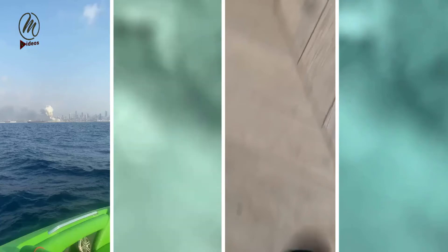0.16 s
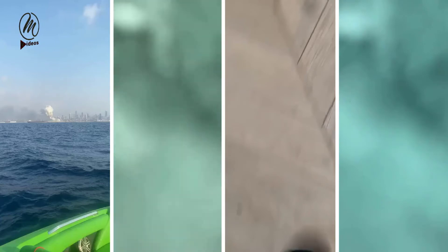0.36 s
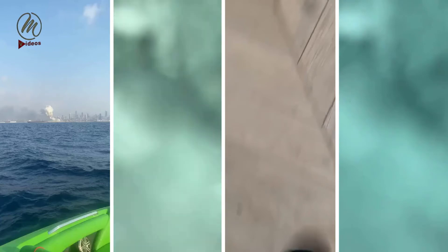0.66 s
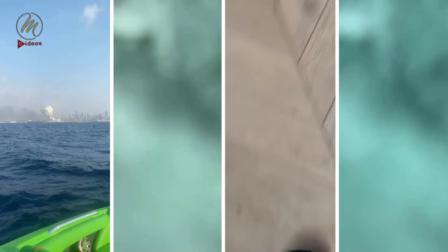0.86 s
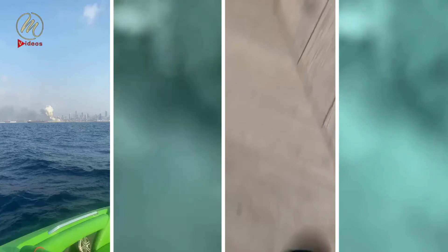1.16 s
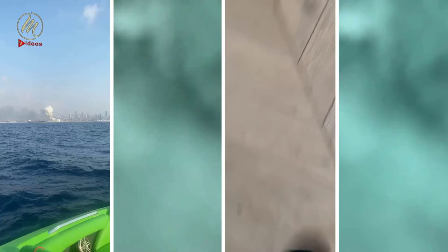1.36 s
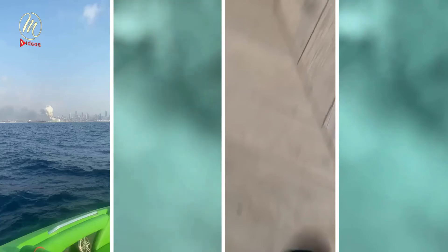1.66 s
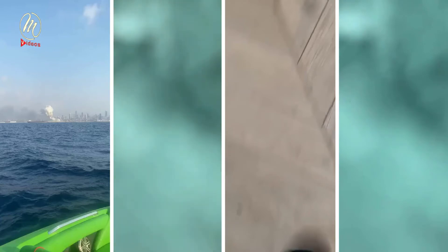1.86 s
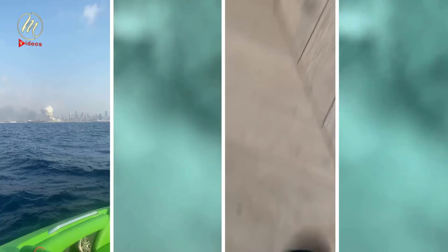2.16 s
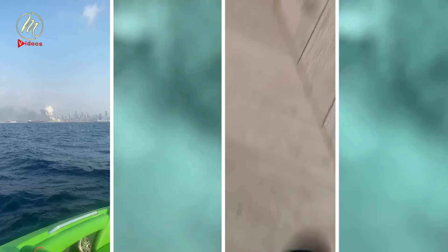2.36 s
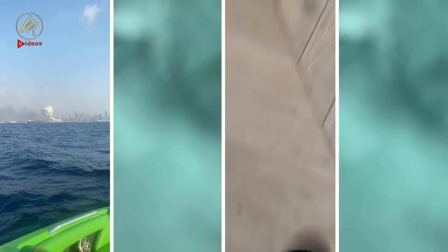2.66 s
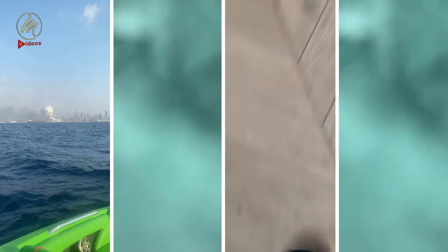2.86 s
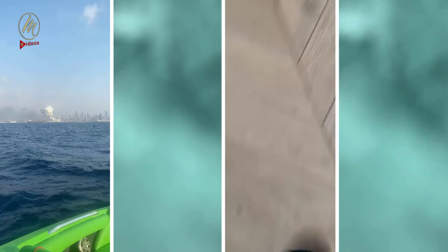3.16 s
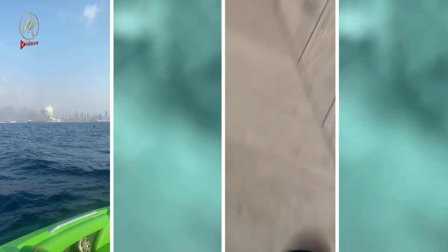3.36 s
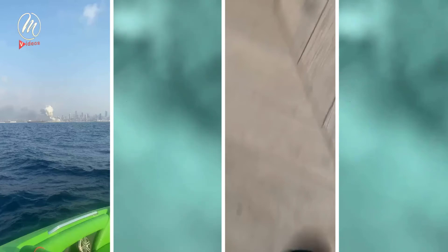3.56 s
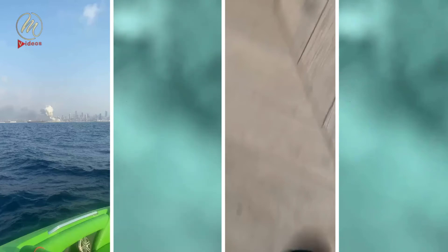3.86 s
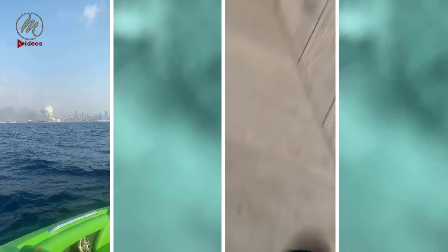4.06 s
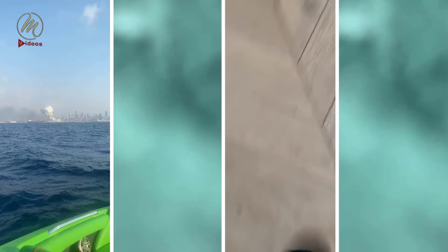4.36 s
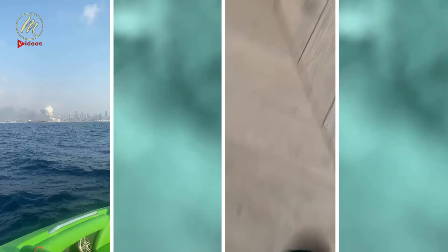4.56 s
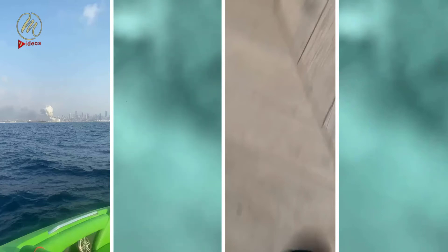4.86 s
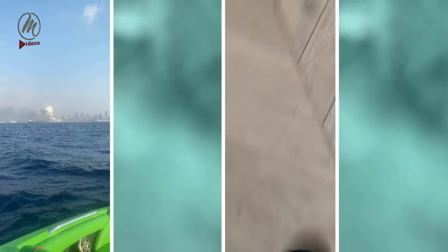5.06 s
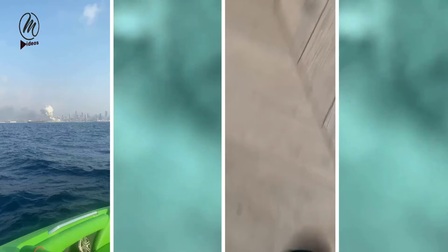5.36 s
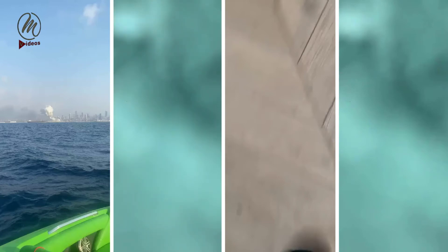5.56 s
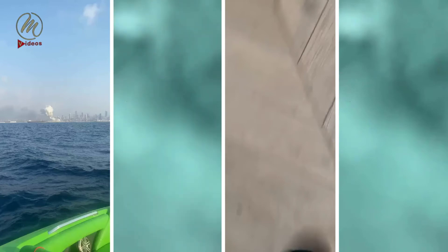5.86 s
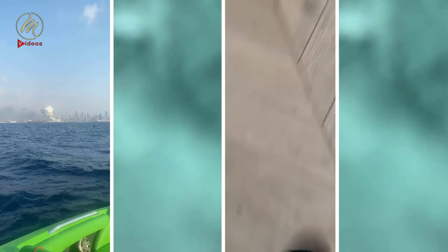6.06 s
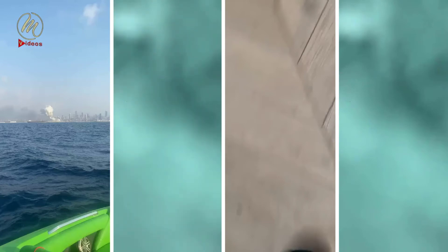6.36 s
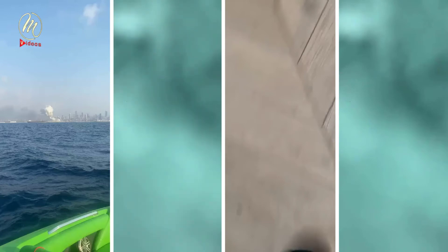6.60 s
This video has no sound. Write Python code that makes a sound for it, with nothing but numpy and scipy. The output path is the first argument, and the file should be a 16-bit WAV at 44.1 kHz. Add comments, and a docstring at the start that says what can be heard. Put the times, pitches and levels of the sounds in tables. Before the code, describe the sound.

From a small boat on open sea, a massive far explosion arrives already loud: ragged gruff reports, sharp snaps and dry ticks over a deep boom. After about a second the crackle smooths into a rolling roar that surges and slowly dies, with soft pressure thuds. Wavelets hiss and slap close by. A phone microphone outdoors, bass-heavy with slightly hollow stereo treble.

```python
"""A huge far explosion over open water opens with ragged reports, snaps and ticks: gated and sparse noise.
Under them a boom, a roll and a roar of filtered noise surge and die away, and pressure waves thud to 4.5 s.
The level dips briefly at 0.8 s, and after about a second the crackle of the roar blurs into smooth noise.
A hiss of wavelets runs throughout, with slaps and ringing bubbles from 1.1 s, a hollow rush near 3 s and
a faint ring of narrow noise bands at 5.5 s. Two microphone ports give the treble a hollow width."""
import sys
import numpy as np
from scipy import signal
from scipy.fft import rfft, irfft, next_fast_len
from scipy.io import wavfile
from scipy.ndimage import uniform_filter1d

SR = 44100
rng = np.random.default_rng(int(sys.argv[2]) if len(sys.argv) > 2 else 0)


def transcribe(signal):
    """Save signal, clipped to [-1, 1], as a 16-bit WAV file at the path in sys.argv[1]."""
    frames = np.atleast_2d(signal).T
    limited = np.clip(frames, -1, 1)
    pcm = np.round(limited * 32767).astype(np.int16)
    wavfile.write(sys.argv[1], SR, pcm)


N = 296855
TIME = np.arange(N) / SR
SIZE = next_fast_len(N + SR // 10, real=True)  # samples in each padded transform
HZ = np.fft.rfftfreq(SIZE, 1 / SR)
EDGE_HZ = 11250  # upper limit of the sound

# how alike the two ports hear: frequency_hz, likeness (held within 0 to 0.999)
PORT_LIKENESS = [(50, 1), (130, 1.06), (330, 0.8), (550, 0.58), (800, -0.37), (1050, -0.05), (1450, 0.7),
                 (2100, 0.42), (2800, 0.7), (4000, 0.1), (4900, 1.04), (5400, 1.04), (6500, 0.1),
                 (7500, .98), (9400, 2), (10400, -0.2), (11200, 1.8)]
# phase between the ports: frequency_hz, left_lead_rad
PORT_LEAD = [(30, -.03), (130, -.1), (500, -.25), (700, -.45), (1100, .2), (1650, .1), (2300, 2.6),
             (3100, 2.9), (4100, 2), (4900, 3), (5500, 3.25), (6000, 3.8), (7200, 6.2), (10000, 6.4),
             (11000, 9.2)]
# loudness between the ports: frequency_hz, left_minus_right_db
PORT_BALANCE = [(55, 0.5), (120, -1.4), (200, -2.5), (340, -4.5), (600, -1), (1100, -2.5), (1950, -3),
                (3500, 0), (6200, 0), (11000, 0)]
# the instant when the level dips: start_s, end_s
DROPOUT = (.803, .8128)
DROPOUT_DB = -36

# partials of the faint thin ring: pitch_hz, relative_level_db
RING_PARTIALS = [(3688, -80), (4705, -89), (5609, -75), (6998, -86), (7725, -81), (8306, -87), (8603, -86),
                 (8942, -88), (9114, -87), (9335, -87), (9808, -88), (10691, -84)]
# loudness of the ring: time_s, level_db
RING_LEVEL = [(5.50, -110), (5.53, -69), (5.76, -69), (5.9, -81), (6.05, -120)]
# resonances of the hollow rush: pitch_hz, width_hz, relative_level_db
RUSH_RESONANCES = [(1150, 1000, -1.5), (2260, 300, -1), (3700, 550, -12), (4400, 140, -1.5)]
# loudness of the rush: time_s, level_db
RUSH_LEVEL = [(2.74, -84), (2.86, -49), (2.95, -44), (3.1, -47), (3.28, -50), (3.4, -56), (3.6, -56),
              (3.9, -54), (4.4, -79.5)]
# spectrum of the hiss: frequency_hz, relative_level_db (per Hz)
WASH_SPECTRUM = [(700, -36), (1500, -1.5), (2300, 6), (3000, 2), (4150, -2), (4450, 4), (4750, -3.5),
                 (5300, -2), (6300, -3.5), (7200, -5), (9000, -7.5), (10500, -11.5), (11800, -3.5)]
# dying away of the hiss: start_level_db, settled_level_db, time_constant_s
WASH_FADE = (-38.5, -78.5, 3.58)
# wavelets that break and lift the hiss: crest_s, length_s, lift_db, extra_treble_lift_db
WAVELETS = [(0.03, 0.23, 1, 15.5), (0.27, 0.096, 5, -3), (0.47, 0.23, 0.5, 4), (0.767, 0.036, 1, 2),
            (1.032, 0.19, 8, 3), (1.145, 0.038, 3, 4), (0.923, 0.032, 3.5, 6), (1.335, 0.25, 4, 0),
            (1.637, 0.2, 2.5, 2.5), (2, 0.22, 9, -1), (2.33, 0.2, 2.5, 2), (2.64, 0.1, 8, 5),
            (2.89, 0.25, 5, 6), (3.13, 0.22, 4.5, 3), (3.316, 0.22, 11.5, -1), (3.808, 0.63, 8, -0.5),
            (4.102, 0.089, 6.5, 2), (4.33, 0.22, 1.5, -1), (4.623, 0.058, 13.5, 0), (5.25, 0.29, 5.5, 3.5),
            (5.588, 0.37, 2, 1.5), (6.11, 0.077, 1, 7.5), (6.34, 0.081, 6.5, 5)]
WAVELET_RISE = 0.26  # share of a wavelet's length that comes before its crest
SPRAY_DB = -7  # gain of the treble of the hiss between wavelets
# ringing bubbles: start_s, level_db (before the envelope), start_pitch_hz, glide_hz_per_s, t60_s
BUBBLES = [(1.987, -23.5, 1500, 0, 0.052), (3.979, -50.5, 9500, 1000, .08), (4.109, -32, 2070, 500, .08),
           (4.121, -37, 1300, 16000, .07)]
# slaps of water: start_s, peak_db (before panning), pitch_hz, width_hz, t60_s, left_minus_right_db
SPLASHES = [(1.138, -9.5, 2020, 2210, 0.1, 2), (1.141, -31, 3760, 1100, 0.25, -3),
            (1.27, -32, 3600, 2400, .25, 1), (1.616, -29, 2470, 1600, 0.16, 0),
            (2.611, -40, 7650, 3000, 0.091, 1), (2.912, -34.5, 3400, 2420, 0.34, -2),
            (3.25, -33, 2760, 2400, 0.19, -2), (4.620, -40, 2200, 1800, 0.097, 2),
            (4.620, -45, 6300, 3400, 0.14, 7), (5.202, -36, 4300, 1800, 0.017, 1),
            (5.204, -28, 930, 303, 0.076, -0.5), (5.207, -39, 2800, 1800, .07, 2),
            (5.217, -44, 4900, 900, .016, 5), (5.255, -51, 7960, 2400, .16, 1),
            (5.525, -53, 3620, 500, .1, -2), (6.61, -55, 6200, 3600, 0.16, 6)]

# pressure waves: middle_s, peak_db, push_to_suck_s (before the microphone thins it)
THUDS = [(0.134, -12, 0.0066), (0.32, -6, 0.0044), (0.352, -4, 0.0039), (0.686, -6.5, 0.004),
         (0.729, -6, 0.0032), (0.79, -4, 0.0055), (0.817, -6.5, 0.0054), (0.855, -12, 0.0039),
         (1.095, -8.5, 0.0033), (1.133, -11.5, .009), (1.605, -8, 0.0042), (1.697, -18, 0.0032),
         (2.310, -7, 0.0039), (2.329, -4.5, 0.004), (2.379, -8, 0.0051), (2.403, -9, 0.0038),
         (3.592, -8, 0.0042), (3.787, -8.5, 0.0048), (4.103, -12, 0.0037), (4.272, -10, 0.0022),
         (4.395, -12, 0.0044), (4.479, -9, 0.0026)]
# spectrum of the dry ticking: frequency_hz, relative_level_db (per Hz)
TICK_SPECTRUM = [(300, -12), (800, 5), (1500, 3), (2500, 1.5), (4500, -9), (7000, -14.5), (11000, -18.5)]
# loudness of the ticking: time_s, level_db
TICK_LEVEL = [(0, -32), (.35, -37.5), (.8, -43.5), (1.1, -37), (1.5, -61), (2.2, -77)]
# spectrum of a snap: frequency_hz, relative_level_db (per Hz)
SNAP_SPECTRUM = [(600, -18), (1500, 6), (2500, 3), (4300, 9), (6500, 2), (9000, -2), (11500, -17)]
# sharp snaps in the crackle: start_s, near_peak_db
SNAPS = [(.025, -5.5), (0.067, -13), (.211, -32), (0.227, -22), (.291, -19), (.329, -26), (.345, -25),
         (.365, -28), (.434, -23), (0.445, -11), (0.495, -13.5), (.509, -26), (.525, -20), (.549, -23),
         (.575, -29), (.694, -19), (.722, -28), (.748, -22), (.753, -26), (.760, -19), (0.771, -16),
         (0.782, -26), (0.798, -25), (.813, -33), (.820, -39), (0.841, -21), (0.93, -22), (1.023, -34),
         (1.076, -24), (2.297, -35)]
# gruff body of a report: frequency_hz, relative_level_db (per Hz)
REPORT_BODY = [(90, -28), (160, 5.5), (240, 4), (340, -0.5), (480, -4.5), (650, -13.5), (900, -21),
               (1800, -55)]
# crack on top of a report: frequency_hz, relative_level_db (per Hz)
REPORT_CRACK = [(350, -16), (700, 7), (1000, -1), (1450, 1.5), (2100, -8.5), (2800, -33), (5000, -21),
                (9000, -34)]
# ragged reports of the blast: start_s, length_s, body_level_db, crack_level_db
REPORTS = [(0.019, 0.019, -18, -41), (0.062, 0.02, -20.5, -45), (0.137, 0.032, -23, -35),
           (0.198, 0.028, -21.5, -35), (0.243, 0.013, -19, -28.5), (0.27, 0.013, -16, -33),
           (0.302, 0.01, -18, -33), (0.343, 0.016, -14.5, -35), (0.38, 0.013, -18.5, -26.5),
           (0.417, 0.019, -28, -28), (0.445, 0.031, -17, -29.5), (0.487, 0.012, -31, -30),
           (0.522, 0.035, -23.5, -31.5), (0.571, 0.032, -27, -33), (0.615, 0.029, -22.5, -42),
           (0.678, .014, -22, -29), (.721, 0.02, -22.5, -37), (0.753, 0.022, -24, -32),
           (0.778, 0.0079, -40, -41), (0.883, 0.018, -29, -30), (0.936, 0.0176, -22.5, -31),
           (0.963, 0.017, -24, -33), (1.012, 0.025, -23.5, -27.5), (1.037, 0.022, -24, -31),
           (1.065, 0.023, -25, -31.5), (1.151, 0.033, -24.5, -32), (1.256, 0.032, -25.5, -56),
           (1.646, 0.023, -28.5, -46), (1.997, 0.017, -26.5, -46)]
# the roar while it crackles: frequency_hz, relative_level_db (per Hz)
CRACKLE_SPECTRUM = [(100, -21), (230, -2.5), (330, 2.5), (480, 4.5), (600, 3), (780, 2), (970, -3.5),
                    (1450, -3.5), (1750, -10.5), (2100, -5), (2800, -20), (5000, -30), (9000, -60)]
# the roar once it is smooth: frequency_hz, relative_level_db (per Hz)
ROAR_SPECTRUM = [(100, -19), (250, -7), (400, 6), (600, 1), (800, -1.5), (1000, -3), (1200, -1),
                 (1450, -1.5), (1900, -11), (2700, -18.5), (4500, -31), (9000, -55)]
# spectrum of the steadier roll: frequency_hz, relative_level_db (per Hz)
ROLL_SPECTRUM = [(40, -29.5), (90, -7.5), (135, 2), (175, 0), (250, -2.5), (340, -11), (480, -18),
                 (750, -28), (1500, -43), (3000, -83)]
# spectrum of the deep boom: frequency_hz, relative_level_db (per Hz)
BOOM_SPECTRUM = [(16, -28), (30, -29), (45, -3), (56, -2.5), (72, 2.5), (105, -3.5), (140, -10.5),
                 (200, -25), (400, -37.5), (1000, -90.5)]
# dying away of the roar: start_level_db, settled_level_db, time_constant_s
ROAR_FADE = (-27, -54, 2.29)
# dying away of the roll: start_level_db, settled_level_db, time_constant_s
ROLL_FADE = (-22, -30, 2.08)
# dying away of the boom: start_level_db, settled_level_db, time_constant_s
BOOM_FADE = (-21.5, -29, 5.2)
# crowds of echoes that lift the blast (negative: a lull):
# middle_s, length_s, boom_lift_db, roll_lift_db, roar_lift_db
SURGES = [(0.01, 0.042, 5.5, -4, 3), (0.146, 0.16, 5.5, -1.5, -3), (0.25, 0.1, 0, 4, 0.5),
          (0.314, 0.027, 4, -4, -2), (0.448, 0.067, 3.5, 3, 0.5), (0.521, 0.065, 9, -1.5, 0.5),
          (0.615, 0.033, 3, 6.5, -0.5), (0.776, 0.06, 1.5, 4.5, -0.5), (0.975, 0.061, 2, 1, 2),
          (1.035, 0.11, 5, 2, 5.5), (1.155, 0.13, 5, -2.5, 5), (1.274, 0.11, 4.5, 1.5, 1.5),
          (1.43, 0.13, 0, 2, 3), (1.656, 0.23, 4.5, 2.5, 4.5), (1.782, 0.059, -5, 0, 2),
          (1.857, 0.26, -1, 1, 2), (2.03, 0.26, 3.5, 2.5, 3.5), (2.148, 0.039, -10, -4, 1.5),
          (2.376, 0.2, 2, 3, 4), (2.47, 0.047, -5, -4, 0.5), (2.974, 0.19, 1.5, 2.5, 7),
          (3.148, 0.12, 2.5, 0.5, 5), (3.283, 0.12, 0.5, 0.5, 6), (3.458, 0.21, 5, 1.5, 2),
          (3.63, 0.064, -7, 4.5, -1), (3.726, 0.065, -1.5, -1, -0.5), (3.83, 0.19, 2, 3.5, 8),
          (4.068, 0.18, 4.5, 6, 5), (4.257, 0.11, 5, 3, 2), (4.366, 0.068, -3.5, 0.5, 2.5),
          (4.663, 0.079, 2, -1, -0.5), (4.542, 0.24, -0.5, 1.5, 6), (4.878, 0.11, 4, 1, 4),
          (5.07, 0.077, 2, 2.5, 0.5), (5.48, 0.06, -1.5, 3, 4.5), (5.75, 0.11, 3, 1, 2.5),
          (5.977, 0.18, -0.5, 1, 5.5), (6.355, 0.27, 1.5, 0.5, 4.5), (6.722, 0.086, 7.5, 1, 3.5)]


def amp(db):
    """Decibels to gain."""
    return 10 ** (np.asarray(db) / 20)


def unit(x):
    """Scales to rms 1."""
    return x / np.sqrt(np.mean(x ** 2) + 1e-20)


def noise():
    """Two unrelated channels of white noise."""
    return rng.standard_normal((2, N))


def decay(t, t60):
    """An envelope that falls 60 dB in t60 seconds."""
    return np.exp(-np.log(1000) * t / t60)


def read(points):
    """Reads a spectrum table on a log-frequency axis."""
    f, value = np.transpose(points)
    return np.interp(np.log(HZ + 1), np.log(f + 1), value)


def follow(rows):
    """Draws a curve through (time, value) rows at every sample."""
    return np.interp(TIME, *np.transpose(rows))


def shaped(x, gain):
    """Filters by a gain for each frequency, without shifting phase."""
    return irfft(rfft(x, SIZE) * gain, SIZE)[..., :N]


def wander(hz):
    """Smooth random movement of rms 1, mostly slower than hz."""
    return unit(shaped(rng.standard_normal((1, N)), np.exp(-(HZ / hz) ** 2)))


def add(mix, s, sound):
    """Mixes a sound in at s seconds."""
    start = max(round(s * SR), 0)
    part = mix[..., start:][..., :sound.shape[-1]]
    part += sound[..., :part.shape[-1]]


def fade(start_db, settled_db, time_s):
    """A level in dB that sinks exponentially towards its resting value."""
    return settled_db + (start_db - settled_db) * np.exp(-TIME / time_s)


def hump(s, length, rise=0.52, order=2):
    """A swell of height 1 at s, above half height for its length; a higher order steepens the flanks."""
    out = np.zeros(N)
    near = slice(max(int((s - 2 * length) * SR), 0), int((s + 2 * length) * SR))
    t = TIME[near] - s
    half_width = length * np.where(t < 0, rise, 1 - rise)
    out[near] = .5 ** (abs(t / half_width) ** order)
    return out


def ports(pair, spectrum, band):
    """Blends two coloured signals as two ports hear them; the mean of both has rms 1 in the band (Hz)."""
    a, b = rfft(pair, SIZE) * amp(read(spectrum))
    same = np.clip(read(PORT_LIKENESS), 0, .999)
    tilt = amp(read(PORT_BALANCE) / 2)
    mid, side = a * np.sqrt(1 + same), b * np.sqrt(1 - same)
    left = (mid + side) * tilt
    right = (mid - side) / tilt * np.exp(-1j * read(PORT_LEAD))
    z = np.array([left, right])
    inside = (HZ > band[0]) & (HZ < band[1])
    return irfft(z, SIZE)[:, :N] / np.std(irfft(z.mean(0) * inside, SIZE)[:N])


def flat_ports(pair):
    """The two ports' blend with no colour added."""
    return ports(pair, [(0, 0), (EDGE_HZ, 0)], (0, EDGE_HZ))


def pops(per_s, spread_db):
    """Two sparse trains of random clicks: many small, a few large."""
    size = amp(spread_db * np.minimum(rng.exponential(1, (2, N)), 4))
    sign = rng.choice([-1, 1], (2, N))
    struck = rng.random((2, N)) < per_s / SR
    return unit(size * sign * struck)


def patches(x, depth_db, wide_bins, long_frames):
    """Lets small areas of time and pitch swell and sink at random, with a gain of rms 1."""
    z = signal.stft(x, nperseg=512)[2]
    field = rng.standard_normal(z.shape[1:])
    for axis, span in enumerate([wide_bins, long_frames]):
        keep = np.exp(-1 / span)
        field = signal.lfilter([1 - keep], [1, -keep], field, axis=axis)
    gain = unit(amp(depth_db * np.clip(unit(field), -3, 3)))
    return signal.istft(z * gain, nperseg=512)[1][:, :N]


def echoes(spectrum, band, steadiness, over_s):
    """Countless overlapping echoes as noise, its power partly evened out over a short window."""
    x = ports(noise(), spectrum, band)
    envelope = abs(signal.hilbert(x.mean(0), SIZE)[:N])
    power = uniform_filter1d(envelope ** 2, int(over_s * SR) + 1)
    return x / (power / power.mean()) ** (steadiness / 2)


def faint_ring(width_hz=22):
    """High, unsteady partials, each a narrow band of noise, ring faintly in the hiss for a moment."""
    power = sum(amp(db) ** 2 / (1 + (2 * (HZ - hz) / width_hz) ** 4) for hz, db in RING_PARTIALS)
    return flat_ports(shaped(noise(), np.sqrt(power))) * amp(follow(RING_LEVEL))


def rush():
    """A passing swell of noise, made hollow by a few resonances, broad and narrow."""
    body = sum(amp(db) / (1 + (2 * (HZ - hz) / width) ** 2) for hz, width, db in RUSH_RESONANCES)
    return unit(shaped(noise(), body)) * amp(follow(RUSH_LEVEL))


def water_levels():
    """Gains in dB of the hiss and its treble: each wavelet breaks quickly and drains more slowly."""
    hiss_lift_db, spray_lift_db = sum(
        np.outer(lifts_db, hump(s, length, WAVELET_RISE)) for s, length, *lifts_db in WAVELETS)
    return fade(*WASH_FADE) + hiss_lift_db, SPRAY_DB + spray_lift_db


def wash(hiss_db, spray_db, fizz=0.56, flutter_db=1.5, bright_hz=5800):
    """Dense hiss with a fine fizz of clicks, swelling and brightening as the water breaks."""
    foam = noise() + fizz * pops(per_s=700, spread_db=0.0)
    foam = patches(foam, depth_db=3.5, wide_bins=0.8, long_frames=5)
    hiss = ports(foam, WASH_SPECTRUM, band=(2300, 4500))
    # the treble swells by its own amount: finer spray is brighter
    treble = shaped(hiss, 1 - 1 / (1 + (HZ / bright_hz) ** 8))
    hiss = hiss - treble + treble * amp(spray_db)
    return hiss * amp(hiss_db + flutter_db * wander(hz=39.0))


def bubbles(rise_s=0.0024):
    """A trapped bubble rings briefly as a decaying sine on one steady or gliding pitch."""
    out, t = np.zeros(N), np.arange(SR // 8) / SR
    for s, db, pitch, glide, t60 in BUBBLES:
        tone = np.sin(2 * np.pi * np.cumsum(pitch + glide * t) / SR)
        add(out, s, amp(db) * tone * np.minimum(t / rise_s, 1) * decay(t, t60))
    return out


def splashes(rise_s=0.0021):
    """Each slap of water is a short dying burst of noise around one pitch."""
    out, t = np.zeros((2, N)), np.arange(SR // 4) / SR
    hz = np.fft.rfftfreq(len(t), 1 / SR)
    spatter = flat_ports(noise())
    for s, db, pitch, width, t60, pan_db in SPLASHES:
        piece = spatter[:, round(s * SR):][:, :len(t)]
        resonance = 1 / (1 + (2 * (hz - pitch) / width) ** 2)
        coloured = irfft(rfft(piece, len(t)) * resonance, len(t))
        burst = coloured * (1 - np.exp(-t / rise_s)) * decay(t, t60)
        pan = amp([[pan_db / 2], [-pan_db / 2]])
        add(out, s, amp(db) * burst / abs(burst).max() * pan)
    return out


def thuds(thin_hz=45):
    """Each wave is a push and a suck, rounded by distance and thinned by the microphone's high-pass."""
    out, t = np.zeros(N), np.arange(-SR // 50, SR // 12) / SR
    microphone = signal.butter(2, thin_hz, "highpass", fs=SR, output="sos")
    for s, db, swing in THUDS:
        wave = signal.sosfilt(microphone, -t * np.exp(-2 * (t / swing) ** 2))
        add(out, s + t[0], amp(db) * wave / abs(wave).max())
    return out


def ticks():
    """Hard little cracks, sparse coloured clicks, pepper the start of the roar."""
    clicks = pops(per_s=420, spread_db=5.0)
    return ports(clicks, TICK_SPECTRUM, band=(600, 4500)) * amp(follow(TICK_LEVEL))


def snaps(t60=0.024, grit=1.0):
    """Brief bright bursts of tiny cracks: noise and clicks under sudden decaying envelopes."""
    strength, t = np.zeros(N), np.arange(SR // 10) / SR
    for s, db in SNAPS:
        add(strength, s, amp(db) * decay(t, t60))
    cracks = noise() + grit * pops(per_s=2200, spread_db=9.0)
    fizz = ports(cracks, SNAP_SPECTRUM, (0, EDGE_HZ))
    return strength * fizz / np.percentile(abs(fizz), 99)


def reports(rise_s=0.0048, fall_s=0.0052):
    """Each bunch of shock fronts jumps up, holds and collapses: a gruff body with a crack on top."""
    levels, t = np.zeros((2, N)), np.arange(SR // 8) / SR
    for s, length, *levels_db in REPORTS:
        gate = np.minimum(t / rise_s, 1) * np.exp(-np.maximum(t - length, 0) / fall_s)
        add(levels, s, np.outer(amp(levels_db), gate))
    body = echoes(REPORT_BODY, band=(200, 700), steadiness=0.29, over_s=0.0096)
    crack = echoes(REPORT_CRACK, band=(700, 2400), steadiness=.3, over_s=0.014)
    return body * levels[0] + crack * levels[1]


def blast_levels():
    """Levels in dB of boom, roll and roar: one fade each, lifted by the surges of echoes."""
    lift = sum(np.outer(lifts_db, hump(s, length, order=3)) for s, length, *lifts_db in SURGES)
    return np.array([fade(*BOOM_FADE), fade(*ROLL_FADE), fade(*ROAR_FADE)]) + lift


def roar(roar_db, grain=0.82, flutter_db=1.0):
    """Small ragged shock fronts crackle at first, then blur into a smooth roar."""
    band = (600, 2000)
    fronts = noise() + grain * pops(per_s=450, spread_db=3.0)
    crackle = ports(fronts, CRACKLE_SPECTRUM, band)
    blurred = patches(noise(), depth_db=3.5, wide_bins=0.5, long_frames=5.1)
    smooth = ports(blurred, ROAR_SPECTRUM, band)
    # equal-power crossfade as the near fronts pass
    blur = np.interp(TIME, [1.1, 1.5], [0, 1])
    level_db = roar_db + flutter_db * wander(hz=34.8)
    return (np.sqrt(1 - blur) * crackle + np.sqrt(blur) * smooth) * amp(level_db)


def rumble(boom_db, roll_db):
    """Only the bass survives the long path: a heaving boom under a steadier roll."""
    boom = echoes(BOOM_SPECTRUM, band=(30, 110), steadiness=0.42, over_s=0.083)
    roll = echoes(ROLL_SPECTRUM, band=(130, 380), steadiness=0.23, over_s=0.13)
    return boom * amp(boom_db) + roll * amp(roll_db)


def scene():
    """The near water and the far blast."""
    water = faint_ring() + rush() + wash(*water_levels()) + bubbles() + splashes()
    boom_db, roll_db, roar_db = blast_levels()
    blast = thuds() + ticks() + snaps() + reports() + roar(roar_db) + rumble(boom_db, roll_db)
    return water + blast


def record(dry):
    """Rounds off the highest peaks, dips the level briefly, then limits the band."""
    rounded = dry / (1 + (dry / .9) ** 6) ** (1 / 6)
    start_s, end_s = DROPOUT
    outside = (TIME < start_s) | (TIME > end_s)
    live = uniform_filter1d(np.where(outside, 1, amp(DROPOUT_DB)), size=40)
    lowpass = signal.firwin(255, EDGE_HZ, window=("kaiser", 8), fs=SR)
    return signal.oaconvolve(rounded * live, lowpass[None], "same")


dry = scene()
out = record(dry)
transcribe(out)
```